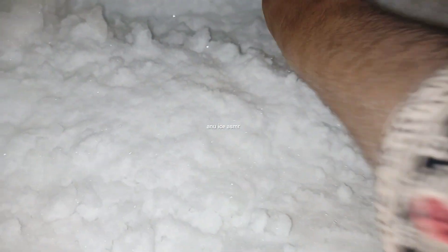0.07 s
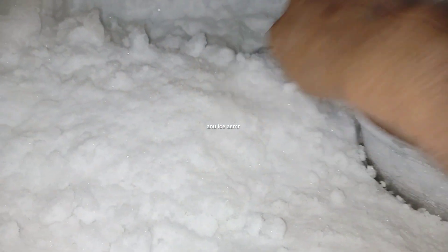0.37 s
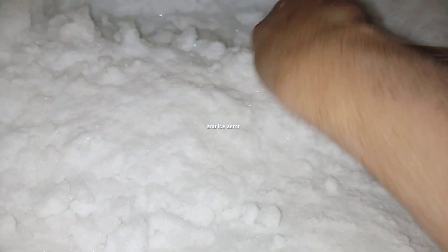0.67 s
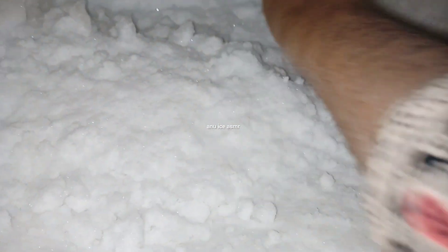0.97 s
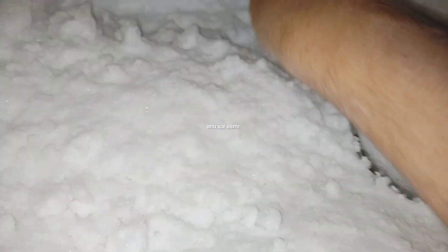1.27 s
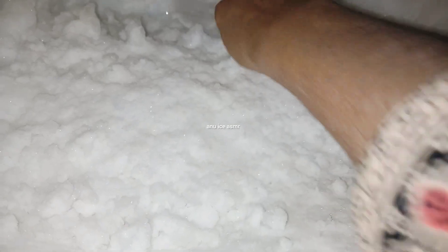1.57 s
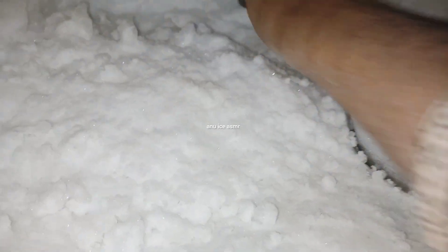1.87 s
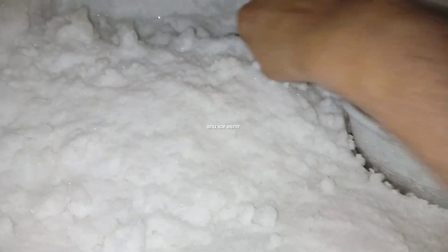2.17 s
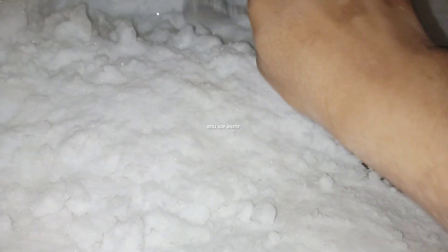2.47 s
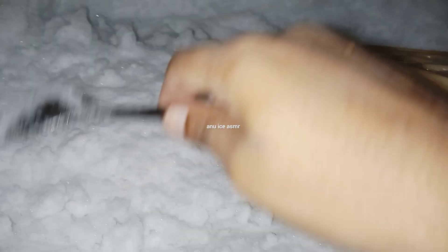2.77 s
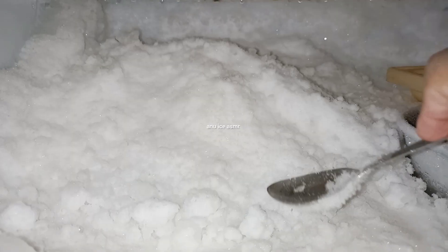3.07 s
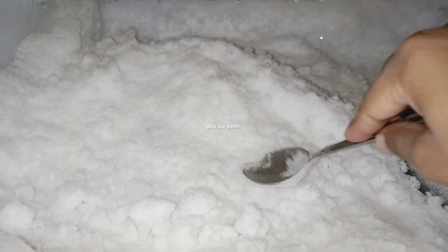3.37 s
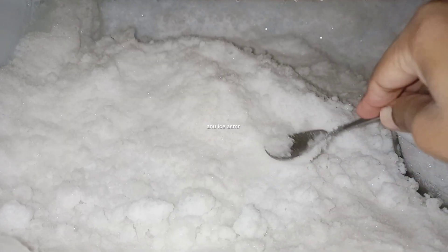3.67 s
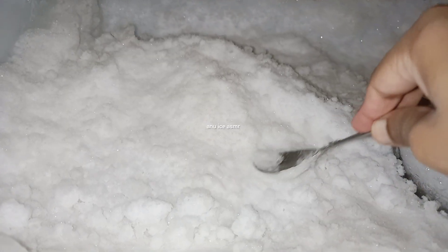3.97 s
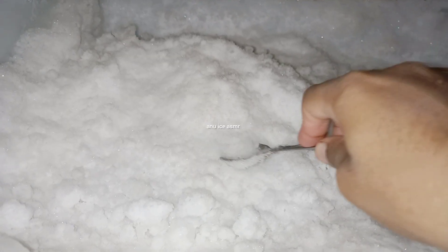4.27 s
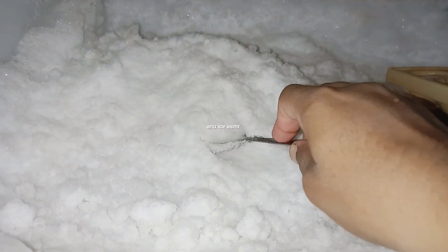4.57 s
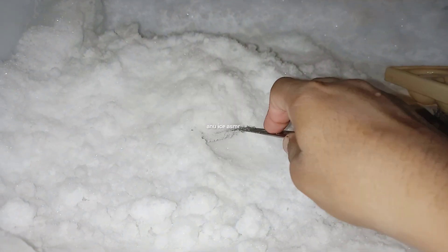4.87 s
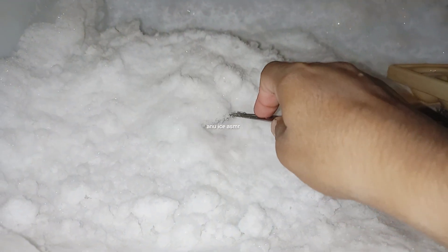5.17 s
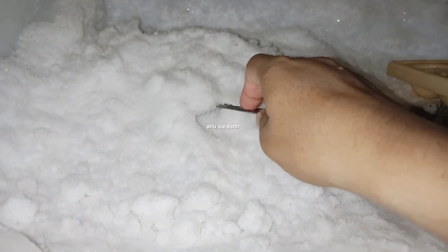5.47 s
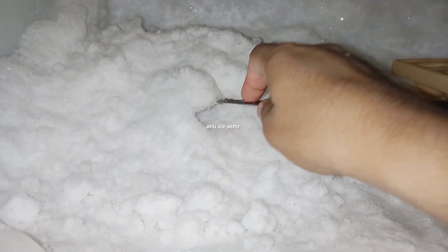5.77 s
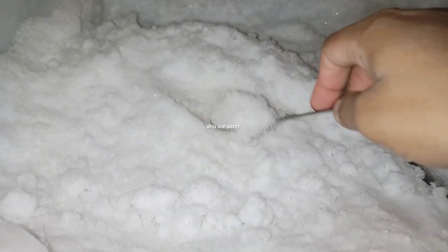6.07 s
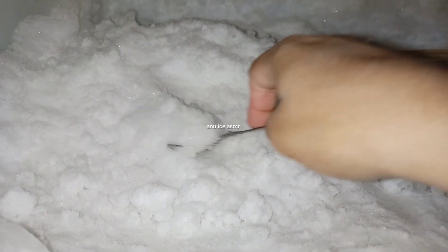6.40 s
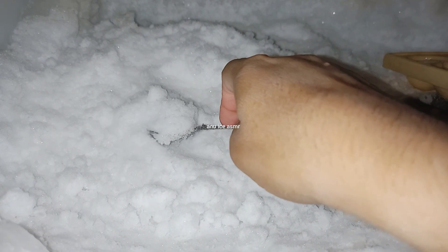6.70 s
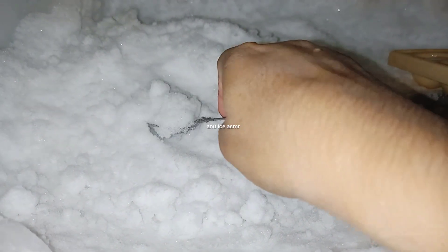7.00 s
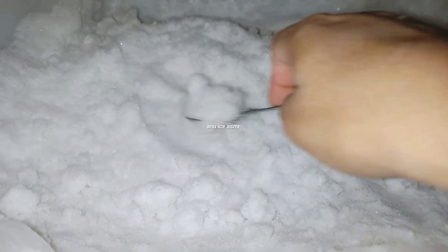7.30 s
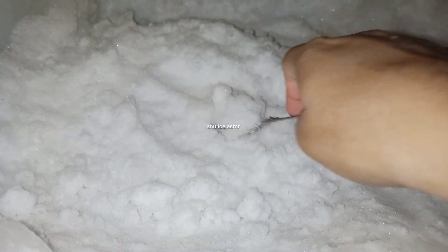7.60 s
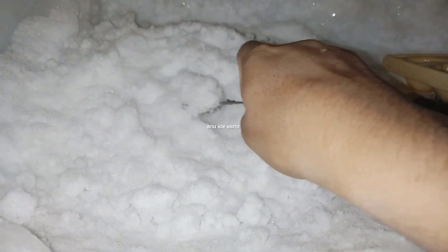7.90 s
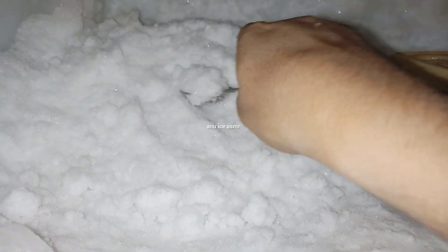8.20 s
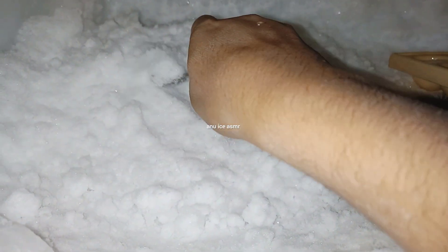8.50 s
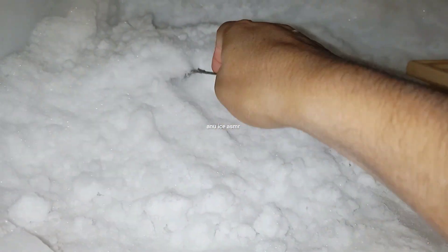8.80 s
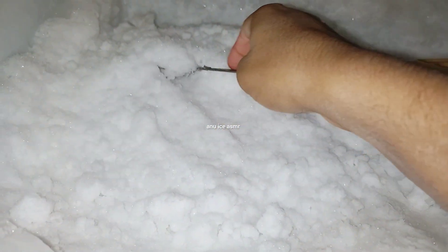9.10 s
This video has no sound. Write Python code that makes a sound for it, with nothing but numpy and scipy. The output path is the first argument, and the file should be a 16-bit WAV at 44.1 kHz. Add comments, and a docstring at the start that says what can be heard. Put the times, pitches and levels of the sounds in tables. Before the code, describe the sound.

Five loud, gritty spoon scrapes on freezer ice give way to quiet crunching, with a faint hum and a distant chirping bird.

```python
"""Over a refrigerator's hum and hiss, a steel spoon scrapes five hard strokes through freezer frost.
Breaking crystals make the grit and rasp, lumps snap off, packed frost squeaks, and the compartment
walls boom under the spoon. It knocks twice, then digs gently into the loose frost, crunching softly.
From the end of the hard strokes on, a distant bird chirps about every 0.7 s."""
import sys
import numpy as np
from scipy import signal
from scipy.fft import rfft, irfft, next_fast_len
from scipy.io import wavfile
from scipy.ndimage import uniform_filter1d, map_coordinates

SR = 44100
rng = np.random.default_rng(int(sys.argv[2]) if len(sys.argv) > 2 else 0)


def transcribe(u):
    """Save the signal u as a 16-bit wav file named by the first command-line argument.

    u: samples, shape (n,) or (channels, n), limited to [-1, 1]; the rate is SR.
    q: integer samples, one column per channel.
    """
    v = np.clip(np.atleast_2d(u).T, -1, 1)
    q = np.round(v * 32767).astype(np.int16)
    wavfile.write(sys.argv[1], SR, q)


N = 407925

# Levels are faders, ahead of each layer's own trim and tone shaping.
# compressor partials: pitch_hz, level_db
HUM_PARTIALS = [(48.6, -65.5), (97, -70.5), (145.6, -68.5), (194, -77), (243, -74.5), (291.5, -73),
                (533, -85.5)]
# tone of the room's rumble: freq_hz, gain_db
ROOM_EQ = [(20, -26), (45, 0.5), (130, 1.5), (190, -9.5), (295, -7), (430, -15.5), (525, -15.5), (680, -24),
           (1240, -28), (2250, -34), (3600, -41), (5500, -45), (9000, -38), (15600, -46.5)]
# fader ride on that rumble: time_s, level_db
ROOM_RIDE = [(0, -52), (2.4, -56), (3.2, -61.5), (4.1, -57.5), (5.6, -59.5), (7.5, -58.5), (9.25, -58.5)]
# resonances of the refrigerator's hiss: freq_hz, width_hz, left_db, right_db
HISS_MODES = [(2690, 70, 0.5, 0.5), (7870, 110, -4, -8), (8190, 80, -7, 6), (9100, 130, -4, -2),
              (13130, 100, -11, -18)]

# gentle scoops in loose frost: start_s, hardest_s, end_s, unevenness, powder_db, crunch_db
SOFT_SCOOPS = [(0, .06, .08, 0.8, -64, -75), (.81, .83, .91, 0.46, -52.5, -68),
               (2.6, 2.77, 2.92, 1.08, -68, -75), (3.34, 3.44, 3.47, .8, -59.5, -73),
               (3.66, 3.73, 3.77, 0.81, -60, -71.5), (4.06, 4.19, 4.44, 1.26, -56, -72),
               (4.5, 4.53, 4.88, 1.2, -62.5, -79), (4.87, 4.91, 4.99, 1.4, -63.5, -72),
               (5.06, 5.15, 5.19, 0.57, -65, -71), (5.39, 5.55, 5.77, 1.7, -60, -72),
               (5.8, 5.82, 5.88, 0.98, -62.5, -73.5), (6.03, 6.09, 6.2, 1.14, -61.5, -72.5),
               (6.25, 6.3, 6.42, 1.76, -51, -60), (6.45, 6.57, 6.595, 1.3, -48, -59),
               (6.79, 6.88, 6.9, 0.47, -62, -71), (6.96, 6.98, 7.01, 1.1, -57.5, -70),
               (7.56, 7.66, 7.78, 0.46, -57.5, -68.5), (7.79, 7.85, 7.95, 0.93, -48, -63),
               (8.09, 8.11, 8.14, 0.47, -60, -71), (8.24, 8.27, 8.4, 0.3, -56.5, -66),
               (8.51, 8.54, 8.91, 0.87, -59, -71.5)]
# long, light drags that join the scoops: same columns
LIGHT_DRAGS = [(3.987, 4.595, 5.9, 0.7, -69, -74), (7.08, 7.304, 7.33, 1.3, -73, -73),
               (7.5, 8.296, 9.06, 1.25, -64, -73)]
# scoop envelopes at unevenness 1: attack_s, build_db, ease_db, release_s, drop_db
POWDER_ENVELOPE = (.13, 6.4, 9.8, 0.19, 17)
CRUNCH_ENVELOPE = (0.12, 3.7, 3.7, 0.016, 8.95)
# the spoon, rubbed by loose frost: freq_hz, width_hz, left_db, right_db
SPOON_MODES = [(2590, 170, -6.5, -9.5), (7860, 200, -1.5, -3.5), (8150, 130, 4, 2.5), (9050, 960, -2.5, -1),
               (11450, 2500, -11, -11.5), (13250, 150, -6, -9.5), (14500, 250, -6.5, -9.5)]
# the hollow under the pressed spoon: freq_hz, width_hz, left_db, right_db
HOLLOW_MODES = [(129, 33, 20, 9), (292, 38, 8, 6), (513.5, 23, -1, 16.5), (1720, 240, 2.5, -5.5),
                (2395, 67, 9, -6), (3000, 63, -36, -13), (4300, 610, -34, -11.5)]
# tone of loose frost crunching: freq_hz, gain_db
CRUNCH_EQ = [(150, -22), (400, 5), (700, -5.5), (1250, 0), (2000, -2.5), (2600, 1), (3600, -2.5),
             (4600, -1), (6200, -1.5), (13000, -2), (15700, -2), (18000, -33.5)]

# five hard strokes, two brief touches: start_s, hardest_s, lift_s, unevenness, grit_db, rasp_db, boom_db
HARD_STROKES = [(0.127, 0.305, 0.41, .9, -21.5, -26.5, -25.5), (0.646, 0.76, 0.81, .7, -21, -34.5, -24.5),
                (1.05, 1.095, 1.263, 1.72, -17, -27.5, -25.5),
                (1.415, 1.585, 1.75, 0.96, -20.5, -27, -27.5), (1.974, 2.15, 2.244, .9, -21.5, -27, -28),
                (2.384, 2.392, 2.394, 1.7, -42, -45, -39), (2.93, 2.969, 2.998, 1.05, -47, -48, -44.5)]
# stroke envelopes at unevenness 1: attack_s, build_db, ease_db, release_s, drop_db
GRIT_ENVELOPE = (0.015, 10, 8, .046, 35)
RASP_ENVELOPE = (0.03, 9.5, 11, 0.025, 65)
BOOM_ENVELOPE = (0.035, 15, 3.5, .08, 31)
# tone of hard frost breaking: freq_hz, left_db, right_db
GRIT_EQ = [(900, -30, -30), (2100, -14, -14), (2900, -8, -9), (4400, -8, -5), (6300, -9, -9),
           (7250, -3, -5), (8400, -9, -2), (9200, -6, -4), (10200, -12, -10), (11800, -11, -9),
           (13200, -3, -7), (14300, -4, -6), (15500, -11, -12), (18000, -35, -35)]
# tone of coarse lumps crumbling: freq_hz, gain_db
RASP_EQ = [(250, -11), (400, -0.5), (550, -5), (800, 1.5), (1050, -7.5), (1400, -1.5), (1900, -9.5),
           (3200, -19), (8000, -59.5)]
# the steel edge, singing as it scrapes: freq_hz, width_hz, left_db, right_db
EDGE_MODES = [(2079, 170, -3, -8.5), (2980, 23, -3.5, -3.5)]
# the booming compartment walls: freq_hz, width_hz, left_db, right_db
WALL_MODES = [(58.3, 40, -12, -25), (123.6, 17, 5.5, 3), (177, 41, -9, -8), (273, 24, -1.5, -6),
              (342.6, 54, -6.5, -18.5), (501, 10, -52.5, -4.5), (767, 18, -54.5, -8)]

# lumps of ice snapping off: start_s, level_db
ICE_SNAPS = [(0.11, -20), (0.1393, -7.5), (0.323, -14.5), (0.4033, -11), (0.5988, -13), (0.6235, -13.5),
             (0.6395, -3.5), (0.769, -3), (1.5224, -4.5), (1.5839, -4.5), (1.968, -16.5), (2.016, -10.5),
             (2.151, -9), (2.1722, -3.5), (2.1804, -2), (2.1829, 6), (2.9173, -30)]
# the spoon bumping the wall: start_s, thump_db, clack_db
WALL_BUMPS = [(.112, -33, -28), (0.301, -11.5, -32), (.41, -21.5, -39), (0.598, -30, -33),
              (0.768, -14.5, -24.5), (1.578, -13, -27), (1.705, -15.5, -39), (2.187, -12.5, -16),
              (2.394, -27.5, -35), (2.79, -36.5, -69), (2.824, -48.5, -57.5), (2.944, -31, -24.5),
              (3.836, -34.5, -55), (6.575, -36, -44), (7.87, -47.5, -47), (8.007, -56.5, -48)]
# the low and the high ring of a bump: pitch_hz, level_db, t60_s
THUMP_MODES = [(130, 0, 0.14), (187, -6, 0.14), (259, -8.5, 0.088)]
CLACK_MODES = [(368, -6, 0.12), (521, -1.5, 0.11), (790, -14.5, .06), (1094, -14.5, 0.036),
               (1580, -12, 0.027), (2632, -27, .06), (3340, -22.5, 0.013)]
# packed frost squeaking under the edge: start_s, level_db, base_pitch_hz
FROST_SQUEAKS = [(.154, -14, 1200), (0.168, -22, 1080), (.171, -23.5, 1050), (.178, -20, 1010),
                 (.186, -23, 920), (.21, -26.5, 1240), (1.709, -20, 1162), (2.826, -54, 1400)]
# crumbs flicking off the spoon: start_s, level_db
CRUMB_FLICKS = [(.466, -35.5), (0.907, -40), (4.513, -54.5), (4.901, -54), (4.948, -57), (6.856, -52),
                (7.033, -62), (7.17, -60), (7.992, -43), (8.132, -60)]
# the bird's calls: start_s, level_db, base_pitch_hz
BIRD_CALLS = [(2.455, -53.5, 4537), (3.013, -53.5, 4210), (3.66, -47.5, 4540), (4.384, -50.5, 4310),
              (5.085, -51, 4500), (6.033, -54.5, 4660), (6.56, -49, 4224), (7.226, -49.5, 4480),
              (8.167, -47.5, 4558), (8.956, -46, 4383)]
# contour within one call: time_s, pitch_ratio, gain_db
CALL_CONTOUR = [(0, 0.99, -1), (.016, 0.91, -0.5), (.04, .93, -3), (0.06, .8, 6.5), (.08, .74, -8.5),
                (0.099, 0.96, -23)]


def amp(db):
    """Decibels to gain."""
    return 10 ** (np.asarray(db) / 20)


def unit(x):
    """Scale to rms 1."""
    return x / np.sqrt(np.mean(x ** 2) + 1e-20)


def wobble(rate_hz):
    """A smooth random modulator with rate_hz turning points a second."""
    points = rng.standard_normal(int(N * rate_hz / SR) + 4)
    return map_coordinates(points, [np.arange(N) * rate_hz / SR])


def add(track, start_s, sound):
    """Mix a sound into a track."""
    part = track[..., max(round(start_s * SR), 0):][..., :sound.shape[-1]]
    part += sound[..., :part.shape[-1]]


def filtered(x, response):
    """Apply a complex frequency response."""
    size = 2 * next_fast_len((N + SR // 2) // 2)
    return irfft(rfft(x, size) * response(np.fft.rfftfreq(size, 1 / SR)), size)[..., :N]


def equalise(x, eq):
    """Minimum-phase EQ of mean power gain 1 through points of freq_hz, gain_db."""
    freq_hz, gain_db = np.transpose(eq)
    def response(hz):
        gain = unit(amp(np.interp(np.log(hz + 1), np.log(freq_hz), gain_db)))
        cepstrum = irfft(np.log(gain))
        half = len(cepstrum) // 2
        cepstrum[1:half] *= 2
        cepstrum[half + 1:] = 0
        return np.exp(rfft(cepstrum))
    return filtered(x, response)


def resonate(x, modes, weight=1):
    """Stereo resonator bank at rms 1. Mode k is scaled by weight ** k; negative fills the valleys."""
    def response(hz):
        total = 0
        for k, (centre_hz, width_hz, left_db, right_db) in enumerate(modes):
            peak = 1j * hz * width_hz / (centre_hz ** 2 - hz ** 2 + 1j * hz * width_hz)
            total += weight ** k * amp([[left_db], [right_db]]) * peak
        return total
    return unit(filtered(x, response))


def fractures(per_s, spread_db, clump_db, clump_hz):
    """Crystals breaking: random clicks that come in clumps as the spoon sticks and slips."""
    breaks = rng.random(N) < per_s / SR
    polarity = np.sign(rng.standard_normal(N))
    sizes = amp(spread_db * np.clip(rng.standard_normal(N), -2, 2))
    clumps = amp(clump_db * np.tanh(wobble(clump_hz)))
    return unit(breaks * polarity * sizes * clumps)


def efforts(moves, envelopes, fade_db_per_s):
    """Each layer's level in dB: a move sets in, builds to its hardest push, eases, lets go and fades."""
    t = np.arange(N) / SR
    levels_db = np.full((len(envelopes), N), -120.)
    for start, hardest, end, unevenness, *peaks_db in moves:
        for k, (attack_s, build_db, ease_db, release_s, drop_db) in enumerate(envelopes):
            times = np.sort([start - attack_s, start, hardest, end, end + release_s, end + release_s + 1])
            first_db, last_db, gone_db = unevenness * build_db, unevenness * ease_db, ease_db + drop_db
            below_db = [first_db + 40, first_db, 0, last_db, gone_db, gone_db + fade_db_per_s]
            span = slice(*np.searchsorted(t, [times[0], times[-1]]))
            move_db = peaks_db[k] - np.interp(t[span], times, below_db)
            levels_db[k, span] = np.maximum(levels_db[k, span], move_db)
    return levels_db


def reverb(x, t60_s, samples):
    """Wet signal only, from a fresh stereo tail of dying noise."""
    tail = rng.standard_normal((2, samples)) * amp(-60 * np.arange(samples) / SR / t60_s)
    tail /= np.linalg.norm(tail, axis=1, keepdims=True)
    return signal.fftconvolve(np.atleast_2d(x), tail, axes=1)


def compartment(x, near_db, near_t60_s, far_db, far_t60_s):
    """Direct sound and echoes of the box; the nearest echoes change as the spoon moves."""
    x = x * np.ones((2, 1))
    near, hop = np.zeros((2, N)), N // 64
    padded = np.pad(x, ((0, 0), (0, 2 * hop)))
    fade = np.sin(np.linspace(0, np.pi, 2 * hop))
    for start in range(0, N, hop):
        piece = padded[:, start:start + 2 * hop] * fade
        add(near, start / SR, reverb(piece, near_t60_s, samples=2048))
    far = reverb(x, far_t60_s, samples=8192)[:, :N]
    mix = x + amp(near_db) * near + amp(far_db) * far
    return mix / np.sqrt(1 + amp(near_db) ** 2 + amp(far_db) ** 2)


def refrigerator():
    """The bed: wavering compressor hum, the room's rumble and a thin resonant hiss."""
    t = np.arange(N) / SR
    hum = np.zeros(N)
    for hz, db in HUM_PARTIALS:
        gain = np.sqrt(2) * amp(db + .53 * wobble(3))
        hum += gain * np.sin(2 * np.pi * hz * t + .26 * wobble(4.3))
    room_noise = rng.standard_normal(N) + rng.standard_normal((2, N))
    room_db = np.interp(t, *np.transpose(ROOM_RIDE))
    rumble = amp(room_db - 1) * unit(equalise(room_noise, ROOM_EQ))
    hiss_noise = rng.standard_normal(N) + .6 * rng.standard_normal((2, N))
    hiss = amp(-75.5) * resonate(hiss_noise, HISS_MODES, weight=-1)
    lean_left = amp([[1.3], [-1.3]])
    return lean_left * (hum + rumble) + hiss


def digging():
    """Loose frost whispers on the spoon; pressed, it crunches and the hollow beneath resounds."""
    moves = SOFT_SCOOPS + LIGHT_DRAGS
    # the fade is powder trickling off
    powder_db, crunch_db = efforts(moves, [POWDER_ENVELOPE, CRUNCH_ENVELOPE], fade_db_per_s=45)
    rubbing = fractures(per_s=3500, spread_db=4.5, clump_db=3.2, clump_hz=50)
    powder = (amp(powder_db - .5) + flick_gain()) * resonate(rubbing, SPOON_MODES, weight=-1.19)
    # a soft gate: the crunch sets in once the pressure passes a threshold
    pressure = amp(crunch_db) / (1 + amp(-75 - crunch_db) ** 3)
    crushing = fractures(per_s=3000, spread_db=4, clump_db=3, clump_hz=80)
    crunch = equalise(amp(9) * pressure * crushing, CRUNCH_EQ)
    pressing = fractures(per_s=2300, spread_db=2.5, clump_db=3, clump_hz=43)
    hollow = amp(3.5) * pressure * resonate(pressing, HOLLOW_MODES)
    powder = compartment(powder, near_db=-8, near_t60_s=.005, far_db=-12, far_t60_s=.06)
    crunch = compartment(crunch, near_db=9.5, near_t60_s=.0085, far_db=-2, far_t60_s=.047)
    return powder + amp([[1], [-1]]) * crunch + hollow


def scraping():
    """The steel edge tears hard frost and sings: bright grit, a lower rasp, walls shaken by the drag."""
    envelopes = [GRIT_ENVELOPE, RASP_ENVELOPE, BOOM_ENVELOPE]
    grit_db, rasp_db, boom_db = efforts(HARD_STROKES, envelopes, fade_db_per_s=100)  # crumbs settle
    breaking = fractures(per_s=7500, spread_db=1.5, clump_db=4, clump_hz=140)
    # each crystal radiates unevenly to left and right
    radiated = unit(breaking * (1 + .8 * rng.standard_normal((2, N))))
    grit = ice_colour(amp(grit_db) * radiated)
    grit = compartment(grit, near_db=-6, near_t60_s=.012, far_db=-15, far_t60_s=.05)
    edge = amp(grit_db - 21.5) * resonate(breaking, EDGE_MODES)
    # coarser lumps crumble on both sides of the spoon
    lumps = np.array([fractures(per_s=1800, spread_db=2, clump_db=3, clump_hz=120) for _ in range(2)])
    rasp = equalise(amp(rasp_db - 3.5) * lumps, RASP_EQ)
    judder = fractures(per_s=1200, spread_db=0, clump_db=6, clump_hz=80)
    boom = amp(boom_db) * resonate(judder, WALL_MODES)
    rasp = compartment(rasp, near_db=-2, near_t60_s=.02, far_db=-7, far_t60_s=.06)
    return grit + edge + boom + rasp


def ice_colour(x, lag_s=.00038, sway_s=.00004):
    """Breaking ice has its own tone on each side; the right lags by a time that shifts with the spoon."""
    hz, left_db, right_db = np.transpose(GRIT_EQ)
    left, right = x * np.ones((2, 1))
    left = equalise(left, np.c_[hz, left_db])
    right = equalise(right, np.c_[hz, right_db])
    delay_s = lag_s + sway_s * wobble(6.5)
    return np.array([left, map_coordinates(right, [np.arange(N) - SR * delay_s], order=5)])


def snaps(attack_s=.0008, t60_s=.035):
    """Lumps of ice give way, each in one sharp burst of cracking."""
    cracks, t = np.zeros(N), np.arange(SR // 16) / SR
    for start_s, db in ICE_SNAPS:
        envelope = amp(db - 9 - 60 * t / t60_s) * (1 - np.exp(-t / attack_s))
        add(cracks, start_s, envelope * rng.standard_normal(len(t)))
    return compartment(ice_colour(cracks), near_db=-5, near_t60_s=.005, far_db=-14, far_t60_s=.05)


def bumps(tick_t60_s=.01, thump_attack_s=.011):
    """The spoon hits the wall: a low thump, a hollow clack and the tick of contact."""
    out, t = np.zeros((2, N)), np.arange(SR // 3) / SR
    for start_s, thump_db, clack_db in WALL_BUMPS:
        tick = amp(-3.5 - 60 * t / tick_t60_s) * rng.standard_normal((2, len(t)))
        thump = ring(THUMP_MODES, t) * (1 - np.exp(-t / thump_attack_s))
        clack = amp([[-4], [0]]) * ring(CLACK_MODES, t)
        add(out, start_s, amp(thump_db) * thump + amp(clack_db) * (clack + tick))
    return out


def ring(modes, t):
    """Damped modes, their balance a little different on each hit and each side."""
    return sum(amp(db + rng.normal(0, 1, (2, 1)) - 60 * t / t60_s) * np.sin(2 * np.pi * hz * t)
               for hz, db, t60_s in modes)


def squeaks():
    """The edge slips over packed frost: a few cycles that fall in pitch."""
    out, t = np.zeros(N), np.arange(SR // 50) / SR
    swell = t / .00094 * np.exp(1 - t / .001)
    for start_s, db, hz in FROST_SQUEAKS:
        cycles = hz * t * (1.1 - t / .014)
        add(out, start_s, amp(db) * swell * np.sin(2 * np.pi * cycles))
    return compartment(out, near_db=-4, near_t60_s=.0074, far_db=-15, far_t60_s=.038)


def flick_gain(attack_s=.0019, t60_s=.067):
    """Short spurts of gain on the powder layer as single crumbs flick off the spoon."""
    gain, t = np.zeros(N), np.arange(SR // 10) / SR
    for start_s, db in CRUMB_FLICKS:
        add(gain, start_s, amp(db - 60 * t / t60_s) * (1 - np.exp(-t / attack_s)))
    return gain


def bird():
    """Falling chirps, buzzy with a fast, uneven trill and blurred by the rooms they cross."""
    out, t = np.zeros((2, N)), np.arange(SR // 9) / SR
    time_s, pitch_ratio, gain_db = np.transpose(CALL_CONTOUR)
    for start_s, db, hz in BIRD_CALLS:
        jitter = unit(uniform_filter1d(rng.standard_normal(len(t)), size=150))
        trill_hz = 230 * (1 + .3 * jitter)
        trill = np.sin(2 * np.pi * np.cumsum(trill_hz) / SR)
        pitch_hz = hz * np.interp(t, time_s, pitch_ratio) * (1 + .14 * trill)
        envelope = amp(db - 6 + np.interp(t, time_s, gain_db))
        call = envelope * np.sin(2 * np.pi * np.cumsum(pitch_hz) / SR)
        add(out, start_s, reverb(call, t60_s=.38, samples=22050))
    return out


def scene():
    """The full mix, heard from just in front of the compartment."""
    return refrigerator() + digging() + scraping() + snaps() + bumps() + squeaks() + bird()


def record(dry):
    """Master chain: a soft clip rounds the highest peaks, then a steep high cut."""
    ceiling, cutoff_hz, transition_hz = .9, 15800, 150
    rounded = dry / (1 + np.abs(dry / ceiling) ** 6) ** (1 / 6)
    return filtered(rounded, lambda hz: np.clip((cutoff_hz - hz) / transition_hz + .5, 0, 1))


dry = scene()
out = record(dry)
transcribe(out)
```